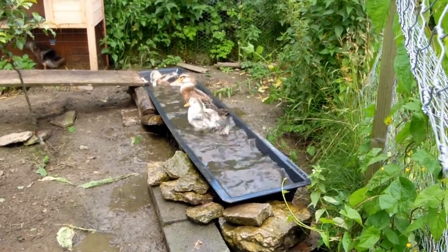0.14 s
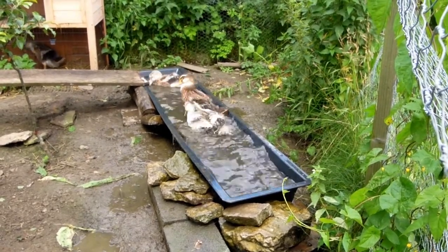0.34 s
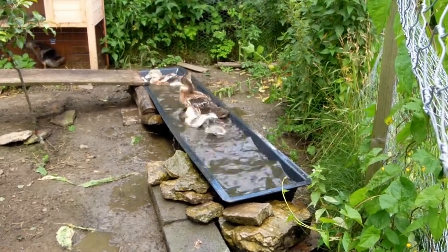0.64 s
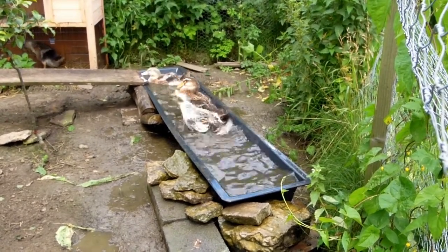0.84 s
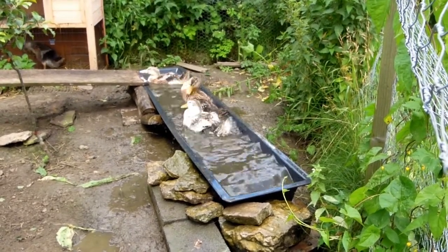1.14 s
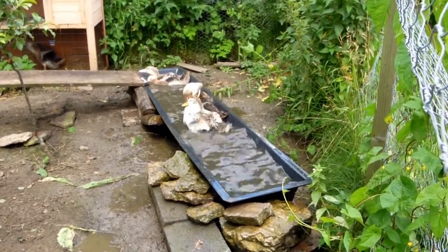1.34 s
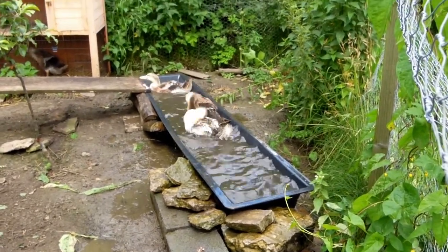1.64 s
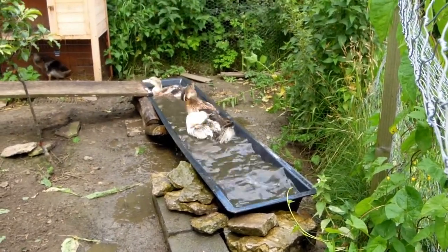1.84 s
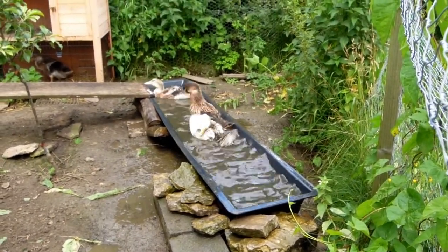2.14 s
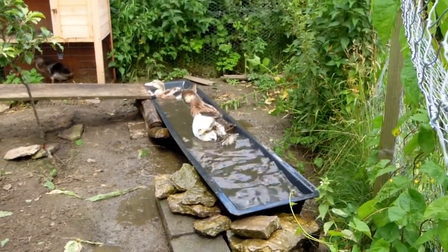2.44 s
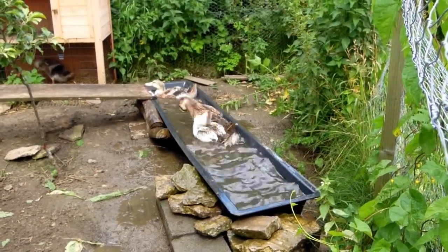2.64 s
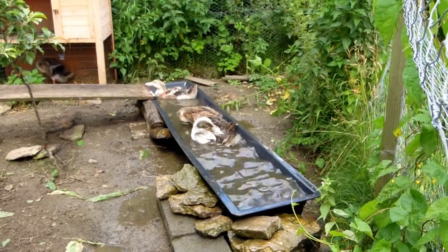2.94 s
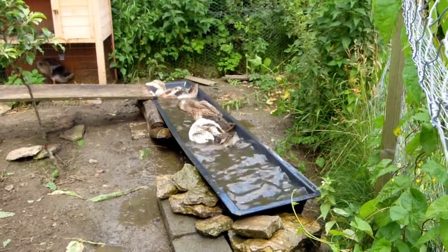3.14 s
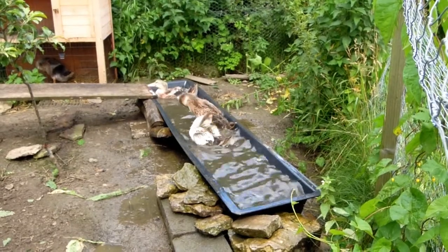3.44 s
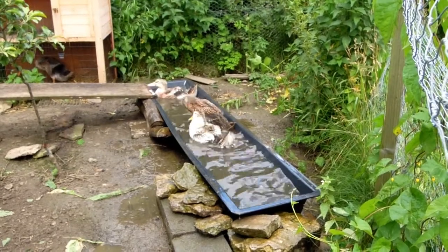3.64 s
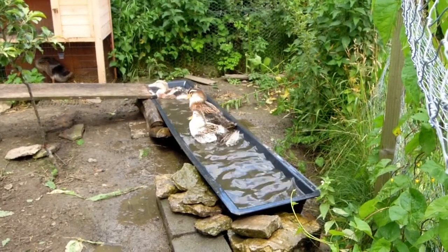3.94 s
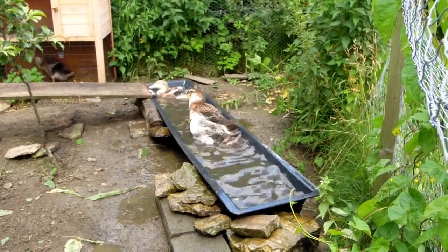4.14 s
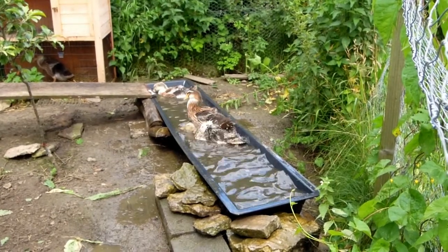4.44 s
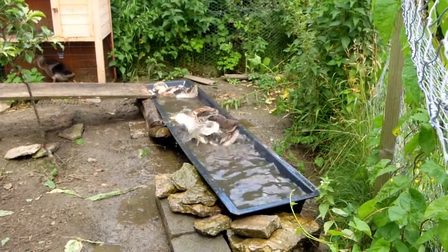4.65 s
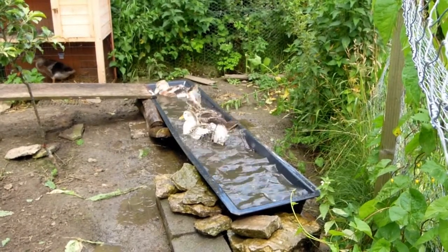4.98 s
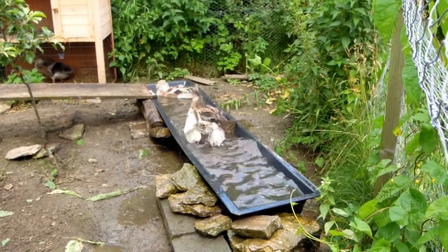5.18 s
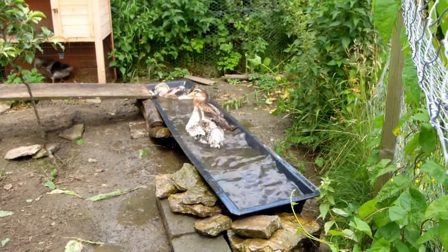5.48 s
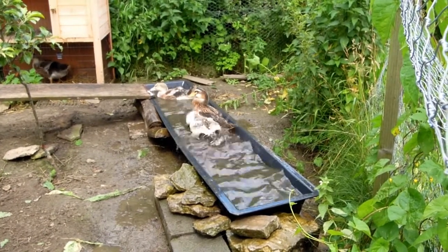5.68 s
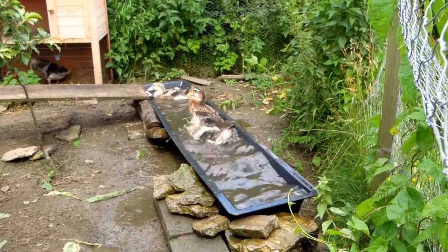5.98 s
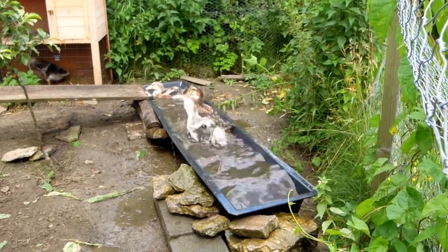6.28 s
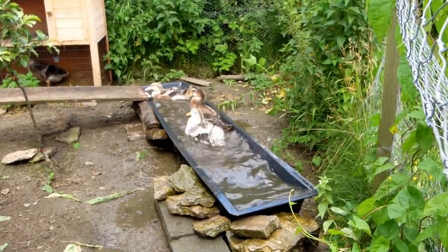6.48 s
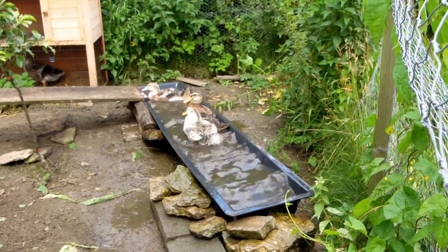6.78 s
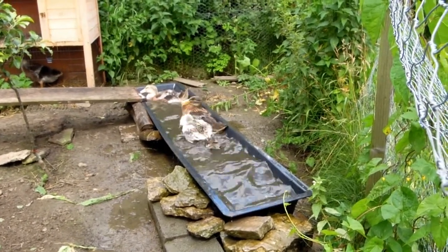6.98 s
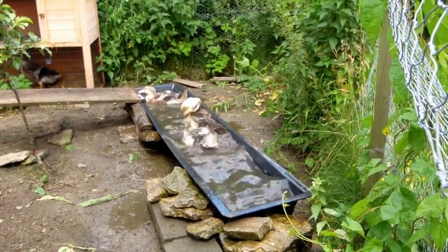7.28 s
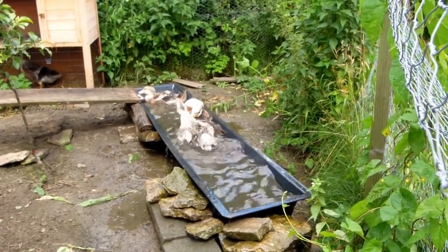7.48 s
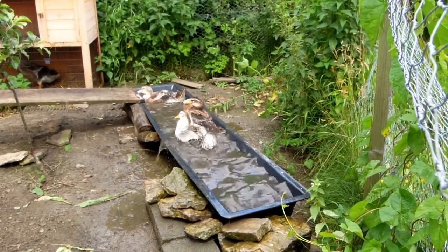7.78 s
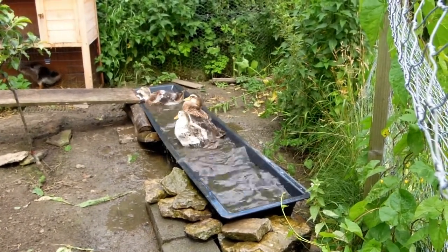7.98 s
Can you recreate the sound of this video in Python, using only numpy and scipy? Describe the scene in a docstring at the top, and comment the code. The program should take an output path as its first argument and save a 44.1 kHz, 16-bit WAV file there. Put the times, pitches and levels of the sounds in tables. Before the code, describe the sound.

Outdoors in a garden, ducks bathe in a shallow trough. Quick shakes throw fine crackling spray, with snapping drops and rising bubble blips. After two seconds the water calms to faint dripping, then heavier sloshing returns past four seconds, with a few dull knocks on the trough. Sparrows chirp throughout with short echoes. Soft air, low traffic drone and slight breeze thumps lie behind a stereo microphone.

```python
"""Ducks bathing in a shallow garden trough: spray and slosh are clumps of ringing droplet clicks that swell
with each shake, drops snap and ring, and trapped bubbles are sines that climb in pitch after a wet slap.
Dull knocks on the trough are noise bursts in two broad resonances. Sparrows chirp as rough, gliding sines
that echo off walls and hedges. Behind lie resonant traffic drone, a thin far tone, garden air in noise bands
and low puffs of breeze on the microphone."""
import sys
import numpy as np
from scipy import signal
from scipy.io import wavfile

SR = 44100
rng = np.random.default_rng(int(sys.argv[2]) if len(sys.argv) > 2 else 0)


def dump_mix(stems):
    """Bounce the given channels to the path in sys.argv[1] as a 16-bit WAV at rate SR."""
    frames = np.atleast_2d(stems).T  # one column per channel
    limited = np.clip(frames, -1, 1)  # hard clip at full scale
    pcm = np.round(limited * 32767).astype(np.int16)
    wavfile.write(sys.argv[1], SR, pcm)


N = 358091   # length in samples

# Garden air: spectrum before overall scaling (f/Hz, relative level/dB per Hz)
AIR_SPECTRUM = [(15, -23), (25, 3), (74, 0.5), (102, -9.5), (173, -8.5), (309, -11), (511, -10.5),
                (1600, -15.5), (2860, -22.5), (4370, -20), (4850, -24.5), (14000, -25.5)]
# How alike left and right are in the garden air (f/Hz, likeness 0 to 1)
AIR_LIKENESS = [(30, 0.49), (60, 0.99), (130, 0.53), (400, 0.56), (1400, 0.47), (4000, 0.14), (9000, 0.016)]
AIR_LEVEL_DB = -48

# Far traffic: swell of the drone (t/s, level/dB)
DRONE_LEVEL = [(0, -55), (1.0, -43.5), (1.9, -53), (2.4, -53.5), (3.0, -64), (3.9, -62), (4.3, -51.5),
               (5.2, -65.5), (6.2, -49.5), (6.95, -51), (7.25, -57), (8.12, -54.5)]
# Resonances of the drone (f/Hz, width of each of two passes/Hz, relative level/dB)
DRONE_RESONANCES = [(128.2, 26, -1.5), (163.2, 29, 0), (195.3, 15, -2.5)]
# Faint tone far off (start t/s, end t/s, f/Hz, level/dB)
FAR_TONES = [(0.104, 1.404, 676.5, -60)]
# Breeze puffs on the microphone (centre t/s, level/dB, Gaussian length/s)
BREEZE_PUFFS = [(1.277, -30.5, 0.033), (6.41, -41, 0.1), (7.65, -42, 0.11), (7.974, -36.5, 0.02)]

# Four sparrow syllables as shapes (t/s, f before the pitch factor/Hz, relative level/dB)
HELD_SHAPE = [(0, 3392, -7.5), (.009, 4015, -2.5), (.017, 4595, -5), (.022, 3802, 2), (.034, 3720, 0.5),
              (.05, 3650, -1.5), (.088, 2664, -18)]
ARCH_SHAPE = [(0, 3270, -9.5), (.014, 4600, -0.5), (.026, 4600, -4.5), (.036, 4200, -1), (.046, 3960, 2),
              (.052, 3000, -13)]
FLICK_SHAPE = [(0, 2880, 0), (.01, 3800, 0.5), (.028, 3750, -1), (.036, 3300, -14)]
STEPS_SHAPE = [(0, 3714, -12), (.008, 4200, -0.5), (.024, 3850, 0.5), (.04, 3890, -5), (.046, 3550, 4),
               (.062, 3465, 2), (.105, 2607, -20.5)]
# When each syllable is sung (t/s, pitch factor, level added to the shape/dB)
HELD_CALLS = [(.702, 1.013, -33.5), (1.974, 1.023, -32), (4.252, 1, -34), (5.622, 1.01, -34.5),
              (7.163, 1.01, -32.5)]
ARCH_CALLS = [(.075, 1.06, -49.5), (.26, 0.98, -35.5), (1.84, 0.92, -47), (2.645, .96, -53.5),
              (2.859, 1.014, -35), (3.262, .98, -42), (6.043, 1.04, -49), (6.154, 1, -35.5),
              (6.631, 0.95, -42), (7.724, 0.8, -48.5)]
FLICK_CALLS = [(.314, 1.01, -37.5), (1.893, 0.96, -43), (2.912, 1.01, -37), (3.302, 0.93, -39),
               (6.208, 1.03, -39.5), (6.675, 0.94, -42)]
STEPS_CALLS = [(.562, 1, -37), (1.447, 0.93, -39.5), (2.117, 0.99, -36), (2.972, 1, -37),
               (4.558, 1.01, -40), (4.825, 0.96, -38)]

# Dull hollow knocks, perhaps a beak or foot on the trough wall (t/s, peak level/dB)
TROUGH_KNOCKS = [(5.521, -33.5), (5.572, -36.5), (5.638, -35.5), (5.718, -37)]
# Resonances of the trough (f/Hz, width/Hz, relative level/dB)
TROUGH_RESONANCES = [(457, 90, 6), (870, 350, -12)]
KNOCK_T60_S = 0.065

# The ducks shake and dunk (full from t/s, hold/s, fine spray level/dB, heavy slosh level/dB)
DUCK_SHAKES = [(0.014, 0.15, -56.5, -69), (0.253, 0.18, -52, -54.5), (0.43, 0.24, -48.5, -52.5),
               (0.705, 0.047, -50.5, -48.5), (0.915, 0.057, -47.5, -56.5), (1.05, 0.06, -45.5, -58),
               (1.425, 0.14, -46.5, -57), (1.77, 0.057, -50.5, -61), (4.434, 0.21, -51, -53),
               (4.726, 0.23, -44.5, -46.5), (5.149, 0.19, -47.5, -46.5), (5.504, 0.021, -54.5, -69),
               (5.63, 0.06, -50, -63), (6.034, 0.044, -50, -57.5), (6.17, 0.096, -52, -52),
               (6.298, 0.14, -47, -53), (6.923, 0.3, -58, -75), (7.293, 0.27, -59, -60.5),
               (7.58, 0.11, -46.5, -57.5), (7.984, .03, -53.5, -67), (8.117, .03, -41, -66)]
SHAKE_ATTACK_S = 0.034
SPRAY_FADE_DB_PER_S, SLOSH_FADE_DB_PER_S = 66, 51
SPRAY_REST_DB, SLOSH_REST_DB = -62.5, -66   # dripping between shakes
CRACKLE_DB = -1   # coarse spray against fine spray
# Colour of the spray droplets (f/Hz, relative level/dB)
SPRAY_TONE = [(2000, -10), (4000, -2), (8000, -3.5), (13000, -2)]
# Colour of the slosh droplets (f/Hz, relative level/dB)
SLOSH_TONE = [(400, 0.5), (1200, -6.5), (3000, 8)]

# Single drops slapping down (t/s, level before the stereo lean/dB, f/Hz)
DROP_TICKS = [(0.431, -29, 12600), (.5172, -29, 7600), (0.5324, -14.5, 4780), (0.617, -45, 9590),
              (0.9548, -16.5, 8000), (1.039, -31, 8650), (1.056, -34.5, 5910), (1.0869, -29, 4780),
              (1.477, -22, 6600), (1.5798, -27, 8370), (1.638, -26, 9500), (1.813, -26.5, 4030),
              (4.4426, -25, 12000), (4.525, -26, 11700), (4.54, -24.5, 6800), (4.5688, -16, 12600),
              (4.738, -23, 4300), (4.778, -30, 6590), (4.8222, -21, 12400), (4.831, -24, 2770),
              (4.8705, -24.5, 6910), (4.953, -25.5, 4200), (5.14, -34, 2880), (5.186, -30, 4600),
              (5.2745, -26.5, 3600), (5.36, -30, 4100), (5.392, -31, 5540), (4.8927, -24.5, 4300),
              (4.945, -19.5, 8200), (5.173, -23.5, 10200), (5.2937, -20, 5900), (5.5002, -30.5, 4550),
              (5.506, -25.5, 4230), (5.6503, -20.5, 9600), (6.256, -21.5, 9600), (6.3268, -23.5, 5270),
              (6.446, -27, 5070), (6.536, -30, 10700), (6.937, -34, 8900), (7.0175, -35, 5270),
              (7.119, -33.5, 4370), (7.2952, -32, 9750), (7.3275, -30, 5500), (7.3855, -34.5, 7500),
              (7.5793, -22, 10400), (7.6919, -21.5, 4830), (7.979, -21.5, 8900)]
# Clear bubbles (t/s, starting level/dB, starting f/Hz, rise/octaves, life/s)
CLEAR_BUBBLES = [ (.117, -39, 1030, 1.55, .057), (1.245, -35, 1420, 1.55, .026),
                 (1.358, -35, 1250, 1.42, .04), (0.443, -35, 1580, 1.2, 0.0078),
                 (0.519, -26, 2670, 0.088, 0.0053), (0.618, -25.5, 2210, 0.12, 0.011),
                 (0.867, -32.5, 2330, 1.07, 0.0049), (1, -41, 1124, 0.25, 0.055),
                 (1.066, -37, 1480, 0.66, 0.014), (1.814, -27.5, 1680, 0.22, 0.0051),
                 (3.412, -33, 1470, .1, 0.0061), (4.672, -32.5, 2740, .1, 0.007),
                 (4.718, -33, 1870, 0.66, 0.015), (4.796, -35.5, 1410, 0.21, 0.039),
                 (4.83, -25, 1030, 0.14, 0.0036), (4.899, -32, 1495, 0.14, 0.031),
                 (5.039, -34.5, 1170, 0.59, 0.021), (5.128, -31, 908, 0.6, 0.024),
                 (5.197, -37.5, 913, 0.78, 0.015), (5.291, -29.5, 726, 0.27, 0.012),
                 (5.332, -32, 2310, .05, 0.011), (5.183, -39, 1910, .1, 0.013),
                 (5.209, -44, 2400, 0.32, .025), (4.77, -37.5, 1060, .1, 0.014),
                 (5.225, -37, 1400, .15, .012), (4.852, -40, 1460, .05, .025),
                 (5.735, -32.5, 1840, 0.34, 0.014), (5.777, -27, 2560, 0.72, 0.0067),
                 (6.233, -27.5, 2850, 0.201, 0.013), (6.1, -37.5, 2750, .2, 0.009),
                 (6.296, -22, 2550, 0.44, 0.015), (6.309, -42, 990, 0.41, 0.037),
                 (6.742, -38.5, 1450, .05, 0.023), (6.827, -34, 2660, 0.078, 0.0081),
                 (6.984, -37, 2270, 0.35, 0.0055), (7.487, -26, 2350, 0.53, 0.0052),
                 (7.526, -34.5, 1450, 0.69, 0.013), (7.58, -35.5, 2430, 0.11, 0.011),
                 (7.654, -29, 2820, 0.28, 0.0025), (7.674, -27.5, 2730, 0.81, 0.0058),
                 (8, -42.5, 1280, 0.31, 0.046)]

CUTOFF_HZ = 15500   # top edge of the recorded band


def from_db(db):
    """Gain of a level in dB."""
    return 10 ** (np.asarray(db) / 20)


def rms_one(x):
    """Scale to unit rms."""
    return x / np.sqrt(np.mean(x ** 2) + 1e-20)


def in_time(rows):
    """Columns of a time curve, read at every sample."""
    s, *columns = np.transpose(rows)
    return [np.interp(np.arange(N) / SR, s, c) for c in columns]


def at_hz(points, hz):
    """Read a spectrum on a log-frequency axis."""
    point_hz, values = np.array(points).T
    return np.interp(np.log(hz), np.log(point_hz), values)


def drift(rate):
    """Slow random motion of spread 1, wandering about rate times a second."""
    r = np.exp(-16 * np.pi * rate / SR)   # computed at one eighth of the sample rate
    slow = signal.lfilter([1], [1, -2 * r, r * r], rng.standard_normal(N // 8 + 8002))[8000:]
    return np.interp(np.arange(N) / 8, np.arange(len(slow)), rms_one(slow - slow.mean()))


def resonance(x, hz, width_hz):
    """Two-pole band-pass with a gain of 1 at its peak."""
    r = np.exp(-np.pi * width_hz / SR)
    feedback = [1, -2 * r * np.cos(2 * np.pi * hz / SR), r * r]
    return signal.lfilter(np.array([1, 0, -1]) * (1 - r * r) / 2, feedback, x)


def add(out, s, sound):
    """Mix a short sound in at time s."""
    i = round(s * SR)
    out[..., i:i + sound.shape[-1]] += sound[..., :N - i]


def echoes(x, t60, per_s, first_s, apart):
    """Scattered reflections, dying away; a share of them is own to each ear."""
    t = np.arange(round(t60 * SR)) / SR
    strikes = rng.random((3, len(t))) < per_s / SR
    taps = rng.standard_normal((3, len(t))) * strikes * (t > first_s)
    taps = (taps[0] + apart * taps[1:]) * from_db(-60 * t / t60)
    taps = taps / np.sqrt(np.sum(taps ** 2, axis=1, keepdims=True))
    return signal.fftconvolve(x[None], taps, axes=1)[:, :N]


def air():
    """Leaves, distant town and microphone hiss: half-octave bands of stereo noise, faintly patchy."""
    out, edges = 0, 20 * 2 ** np.arange(0, 9.6, .5)
    white = rng.standard_normal((2, 2, N))
    for k, (low, high) in enumerate(zip(edges, edges[1:])):
        band = signal.butter(2, [low, high], "band", fs=SR, output="sos")
        mid, side = signal.sosfilt(band, white[k % 2])   # neighbouring bands use separate noise
        hz = np.sqrt(low * high)
        alike = np.clip(at_hz(AIR_LIKENESS, hz), 0, 1)
        gain = from_db(at_hz(AIR_SPECTRUM, hz) + 1.3 * drift(3.85))
        out = out + gain * (np.sqrt(1 + alike) * mid + np.sqrt(1 - alike) * side * [[1], [-1]])
    return from_db(AIR_LEVEL_DB) * rms_one(out)


def traffic():
    """Engine noise from afar, through three low resonances, and a thin tone of wavering level."""
    t, white = np.arange(N) / SR, rng.standard_normal((3, N))
    engines = white[0] + 0.11 * white[1:]   # mostly common to both ears
    drone = sum(from_db(db) * resonance(resonance(engines, hz, width), hz, width)
                for hz, width, db in DRONE_RESONANCES)
    tone = 0
    for start, end, hz, db in FAR_TONES:
        fade = np.clip(np.minimum(t - start, end - t) / 0.072, 0, 1)
        tone = tone + from_db(db) * fade * np.sin(2 * np.pi * hz * t)
    return from_db(in_time(DRONE_LEVEL)[0]) * rms_one(drone) + tone * from_db(1.2 * drift(23))


def breeze():
    """Short puffs of low turbulence, partly own in each microphone port."""
    t, white = np.arange(N) / SR, rng.standard_normal((3, N))
    low_pass = signal.butter(2, 70, fs=SR, output="sos")
    rumble = signal.sosfilt(low_pass, white[0] + 2.5 * white[1:])
    puffs = sum(from_db(db) * np.exp(-((t - s) / length) ** 2) for s, db, length in BREEZE_PUFFS)
    return rms_one(rumble) * puffs


def sparrows(rasp_hz):
    """Sines glide along each shape; a fast flutter of level and pitch roughens them towards the end."""
    out, flutter, waver = np.zeros(N), drift(rasp_hz), drift(rasp_hz)
    for shape, calls in [(HELD_SHAPE, HELD_CALLS), (ARCH_SHAPE, ARCH_CALLS),
                         (FLICK_SHAPE, FLICK_CALLS), (STEPS_SHAPE, STEPS_CALLS)]:
        at, *columns = np.transpose(shape)
        t = np.arange(0, at[-1], 1 / SR)
        hz, shape_db = (np.interp(t, at, column) for column in columns)
        rasp = .4 + .9 * (t / at[-1]) ** 2
        for s, factor, db in calls:
            span = slice(round(s * SR), round(s * SR) + len(t))
            pitch = factor * hz * (1 + 0.0743 * rasp * waver[span])
            level = from_db(db + shape_db) * (1 + rasp * flutter[span])
            add(out, s, level * np.sin(2 * np.pi * np.cumsum(pitch) / SR))
    return out


def knocks():
    """Each knock is a short burst of noise in the broad resonances of the trough."""
    out, t = np.zeros(N), np.arange(3000) / SR
    for (s, db), noise in zip(TROUGH_KNOCKS, rng.standard_normal((len(TROUGH_KNOCKS), 3000))):
        burst = noise * from_db(-60 * t / KNOCK_T60_S)
        body = sum(from_db(mode_db) * rms_one(resonance(burst, hz, width))
                   for hz, width, mode_db in TROUGH_RESONANCES)
        add(out, s, from_db(db) * body / np.abs(body).max())
    return out


def shaking(column, fade_db_per_s, rest_db):
    """Level in dB of one water layer: each shake swells, holds and fades; their powers add."""
    t, power = np.arange(N) / SR, from_db(2 * rest_db)
    for row in DUCK_SHAKES:
        since = t - row[0]
        swell = np.clip(since / SHAKE_ATTACK_S + 1, 0, 1) ** 2   # full at the listed time
        fade_db = fade_db_per_s * np.maximum(since - row[1], 0)
        power = power + swell * from_db(2 * (row[column] - fade_db))
    return 10 * np.log10(power)


def droplets(level_db, colour, per_s, spread_db, cycles, clump_db):
    """Clumps of droplets, each a click that rings a few cycles; high and low ones clump partly apart."""
    pitches = np.geomspace(colour[0][0], colour[-1][0], 14)
    dealt = rng.integers(0, 14, N)   # which pitch a droplet gets
    height = dealt / 13              # 0 lowest pitch, 1 highest
    clumps = from_db(clump_db * (np.sqrt(1 - height) * drift(25) + np.sqrt(height) * drift(25)))
    sizes = from_db(spread_db * np.minimum(rng.exponential(1, N), 4)) * rng.choice([-1, 1], N)
    clicks = sizes * (rng.random(N) < per_s * clumps / SR)
    lean = from_db(rng.normal(0, 0.44, N) * [[1], [-1]])
    flips = np.where(rng.random((2, N)) < .22 * height, -1, 1)   # high droplets sound wider
    sides = clicks * lean * flips
    rings = sum(from_db(at_hz(colour, hz)) * resonance(sides * (dealt == k) + 1e-18, hz, 1.04 * hz / cycles)
                for k, hz in enumerate(pitches))
    return from_db(level_db) * rms_one(rings)


def ticks():
    """A drop gives a small snap, a ring of a few cycles and a short fizz of droplets."""
    out, t = np.zeros((2, N)), np.arange(600) / SR
    fizzes = rng.standard_normal((len(DROP_TICKS), 2, 600))
    leans_db = rng.normal(0, 1.0, len(DROP_TICKS))
    snap = .35 * np.diff(np.exp(-(t * SR / 1.5 - 2) ** 2), prepend=0)
    for (s, db, hz), fizz, lean_db in zip(DROP_TICKS, fizzes, leans_db):
        decay = from_db(-60 * t * hz / 28.4)   # 60 dB down after 28.4 cycles
        ring = np.sin(2 * np.pi * hz * t) * decay * np.minimum(t / 0.000046, 1)
        tail = resonance(fizz, hz, 2.1 * hz) * from_db(-2.5 - 60 * t / 0.014)
        add(out, s, from_db(db + lean_db * np.array([[1], [-1]])) * (ring + snap + tail))
    return out


def bubble(db, hz, octaves, life):
    """A wet slap traps a bubble, which rings and climbs in pitch as it nears the surface and bursts."""
    u = np.arange(round(life * SR)) / (life * SR)   # 0 to 1 over its life
    fade_db = 19 - 11 * octaves   # a rising bubble radiates better as it climbs, so it fades less
    attack, burst = np.minimum(u * life / 0.00056, 1), np.minimum((1 - u) / 0.017, 1)
    shape = attack * from_db(-fade_db * u) * burst
    climb = np.minimum(hz * 2 ** (octaves * u ** (.6 + .8 * octaves)), SR / 3)
    ring = shape * np.sin(2 * np.pi * np.cumsum(climb) / SR)
    splash = resonance(rng.standard_normal(len(u)), min(2 * hz, SR / 3), 2 * hz)
    slap = splash * from_db(-2.5 - 60 * u * life / 0.0095)
    return from_db(db) * (ring + slap)


def bubbles(slosh_db):
    """The clear bubbles, and faint chance ones that swell with the slosh."""
    out = np.zeros(N)
    for s, db, hz, octaves, life in CLEAR_BUBBLES:
        add(out, s, bubble(db, hz, octaves, life))
    for when, size, rise, loss in rng.random((1600, 4)):
        s, hz = when * N / SR, 700 * 2 ** (2.2 * size)
        db = slosh_db[int(when * N)] + 6.0 - 14 * loss
        add(out, s, bubble(db, hz, 0.93 * rise, 13 / hz))   # each lives 13 cycles of its starting pitch
    return out


def scene():
    """Birds far and wet, water near and almost dry, background all round."""
    background = air() + traffic() + breeze()

    chirps = sparrows(rasp_hz=260)
    near = from_db(-1.0) * echoes(chirps, t60=.18, per_s=700, first_s=.005, apart=.25)
    far = from_db(-10.5) * echoes(chirps, t60=.45, per_s=2000, first_s=0.013, apart=1.0)
    birds = chirps + near + far

    spray_db = shaking(2, SPRAY_FADE_DB_PER_S, SPRAY_REST_DB)
    slosh_db = shaking(3, SLOSH_FADE_DB_PER_S, SLOSH_REST_DB)
    mist = droplets(spray_db, SPRAY_TONE, per_s=8000, spread_db=0.0, cycles=10.6, clump_db=4.0)
    crackle = droplets(spray_db + CRACKLE_DB, SPRAY_TONE, per_s=500, spread_db=4, cycles=11, clump_db=4)
    slosh = droplets(slosh_db, SLOSH_TONE, per_s=700, spread_db=4.5, cycles=16.4, clump_db=7.5)

    plops, drops = bubbles(slosh_db) + knocks(), ticks()
    close = plops + drops.mean(axis=0)
    splash_echo = from_db(-7) * echoes(close, t60=0.083, per_s=2300, first_s=.002, apart=0.075)
    water = plops + drops + splash_echo + mist + crackle + slosh
    return background + birds + water


def record(dry):
    """The top falls away sharply, then the band is cut."""
    dull = signal.sosfilt(signal.cheby2(12, 30, 14500, fs=SR, output="sos"), dry)
    return signal.sosfilt(signal.cheby2(12, 70, CUTOFF_HZ, fs=SR, output="sos"), dull)


dry = scene()
out = record(dry)
dump_mix(out)
```